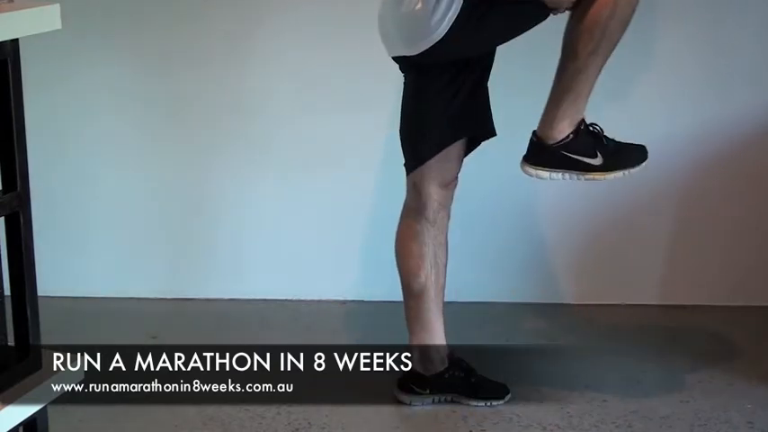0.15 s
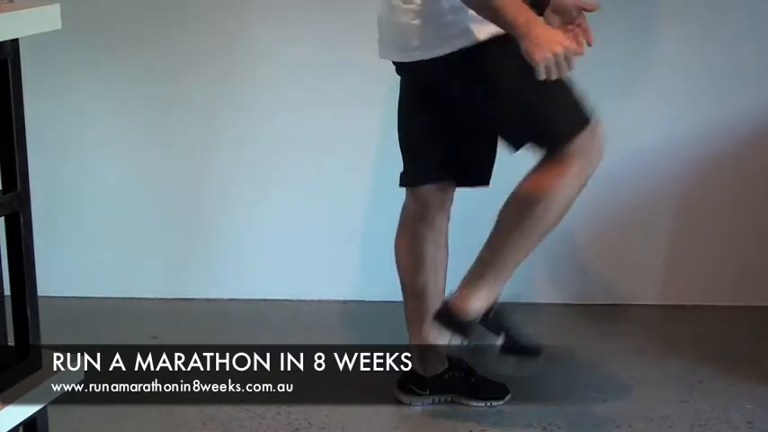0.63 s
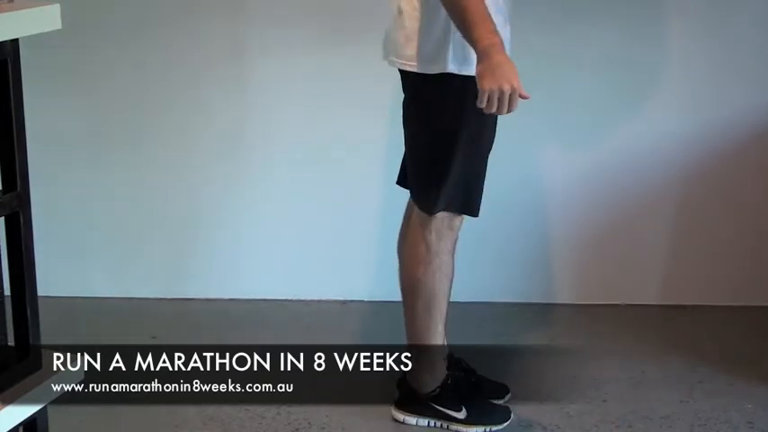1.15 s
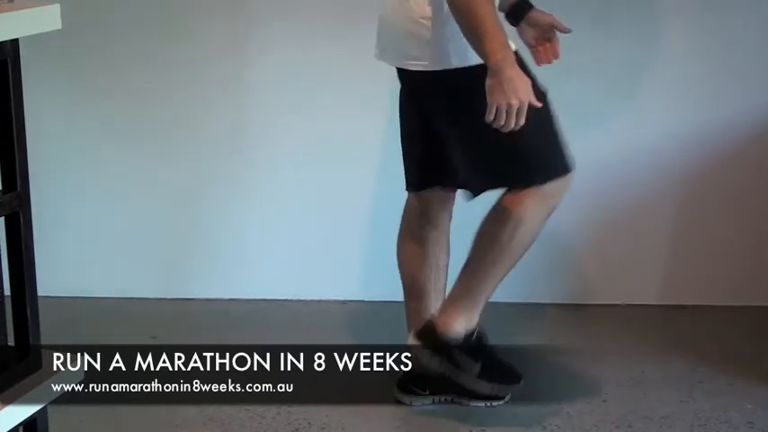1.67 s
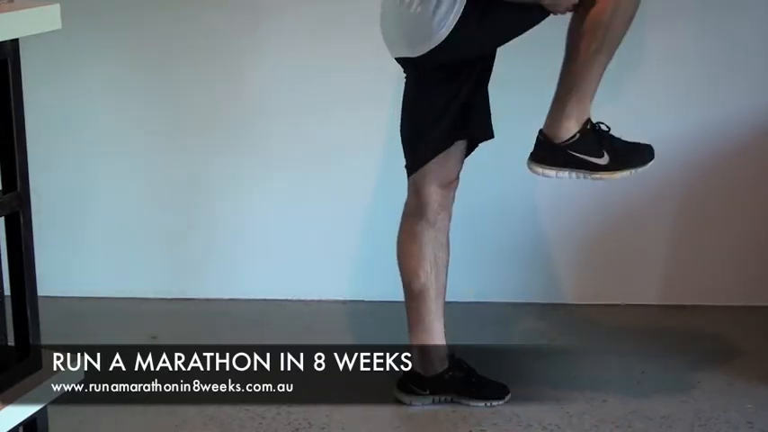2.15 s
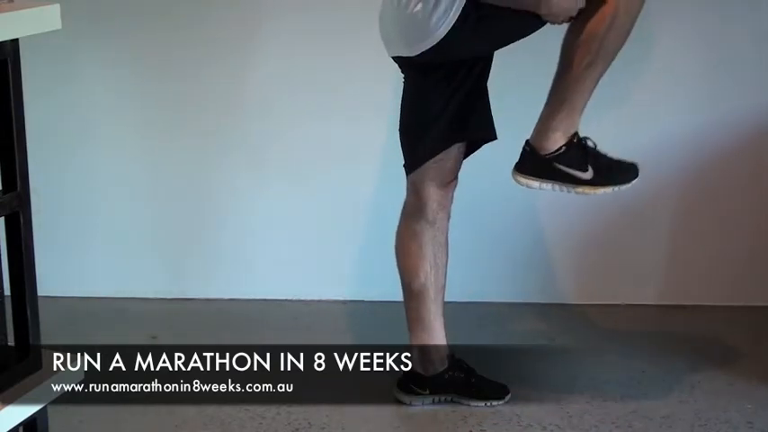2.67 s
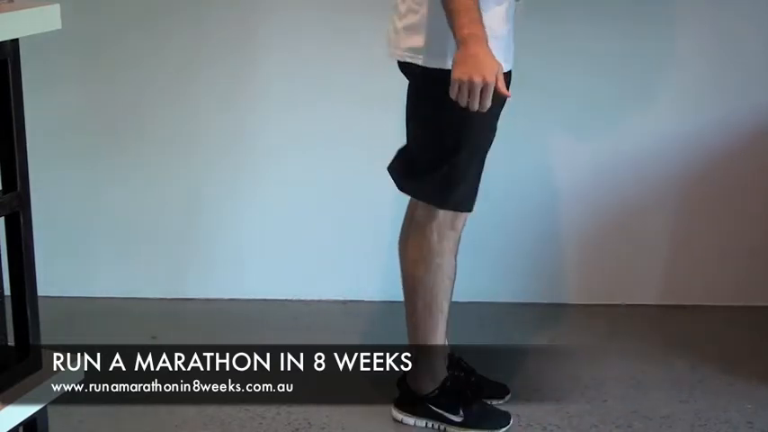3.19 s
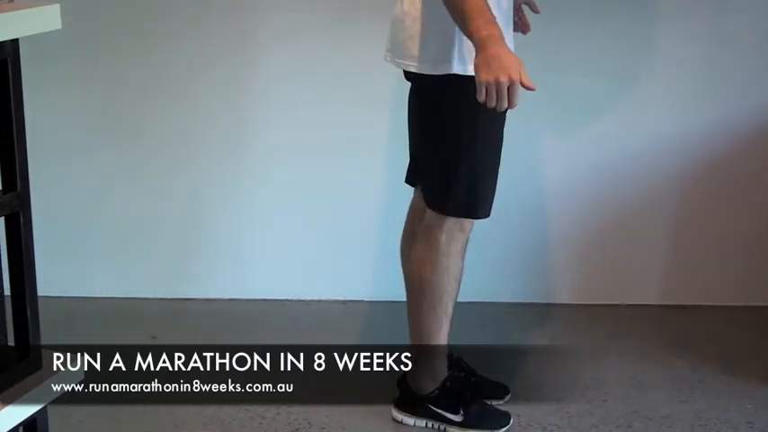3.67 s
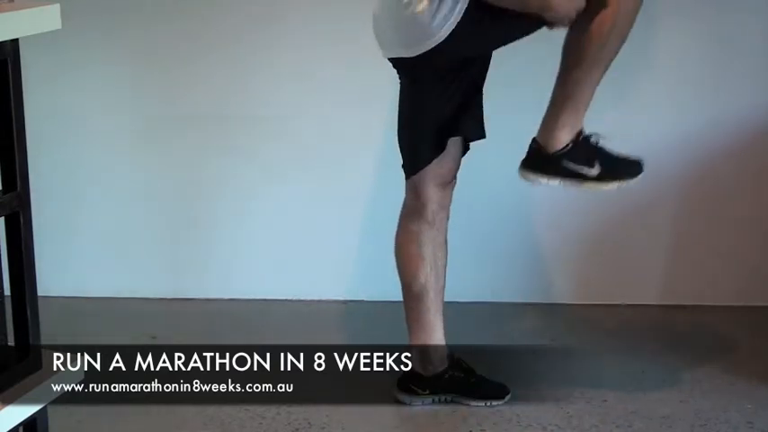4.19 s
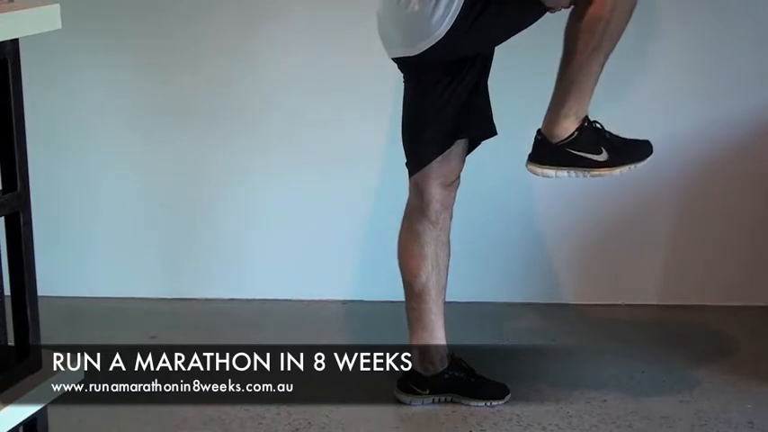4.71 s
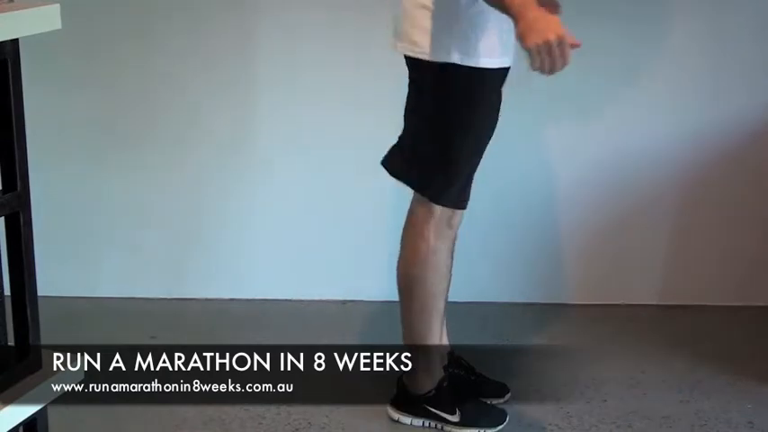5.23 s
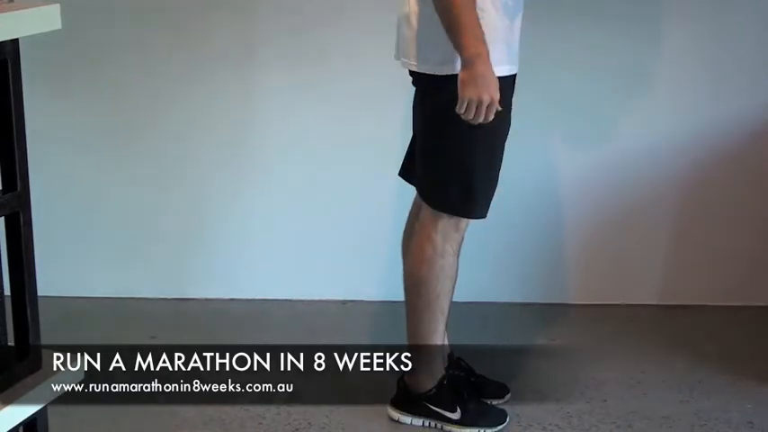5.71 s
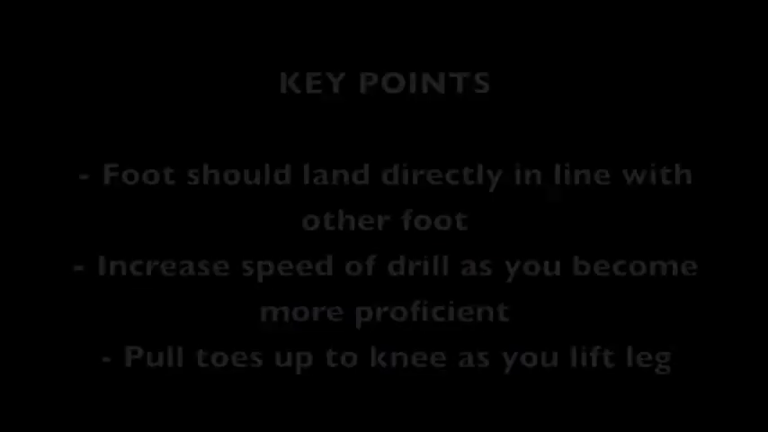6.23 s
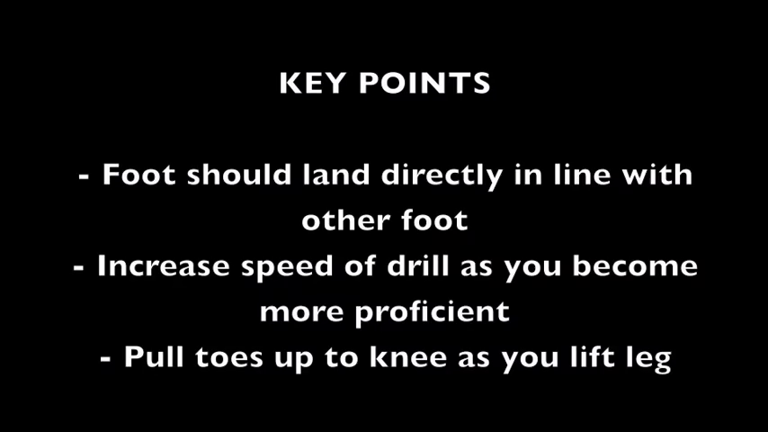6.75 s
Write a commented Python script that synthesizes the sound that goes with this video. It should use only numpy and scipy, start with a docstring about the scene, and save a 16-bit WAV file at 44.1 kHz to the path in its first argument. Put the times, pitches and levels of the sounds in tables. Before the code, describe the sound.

In a bare, hard-walled room, a rubber-soled shoe slaps concrete three times, roughly two seconds apart, the later two fuller and louder. Each smack is preceded by a light brush of shorts and followed by a short bright echo. Between them come quiet cloth rustle, foot scuffs and a faint hum. The camera microphone is fairly close, and the ending fades quickly to silence.

```python
"""Three hard slaps of a rubber-soled shoe on concrete ring through a bare room; loose shorts rustle between them.
Each slap is a pair of minimum-phase pulses convolved with wall echoes and a diffuse tail, plus low room modes.
Cloth, shuffle and air are coloured noise, squeaks are damped sines, ticks are decaying bands of noise.
The room hums faintly and the camera whines for a while; its limiter flattens the loudest slaps.
The sound fades out at the end."""
import sys
import numpy as np
from scipy import signal
from scipy.fft import rfft, irfft, next_fast_len
from scipy.io import wavfile
from scipy.ndimage import uniform_filter1d, map_coordinates

SR = 44100
rng = np.random.default_rng(int(sys.argv[2]) if len(sys.argv) > 2 else 0)


def bounce(signal):
    """Save signal as a 16-bit WAV file at the path given by the first command-line argument."""
    frames = np.transpose(np.atleast_2d(signal))
    limited = np.clip(frames, -1, 1)
    pcm = np.round(limited * 32767).astype(np.int16)
    wavfile.write(sys.argv[1], SR, pcm)


def field_ratio(decibels):
    """Amplitude ratio for a level in dB (20 dB per decade); scalars and array-likes work."""
    return 10 ** (np.asarray(decibels, dtype=float) / 20)


N = 302526

# Slaps: (time [s], blow level [dB], crack level relative to the blow [dB])
SLAP_EVENTS = [(0.779, 3.5, -11), (3.0520, 12.5, -18), (5.1620, 13.5, -13.5)]
# Relative spectrum of the sole meeting the floor, one list per slap: (frequency [Hz], level [dB])
SOLE_SPECTRA = [
    [(60, -39), (200, -13.5), (371, -4), (448, -10), (621, -1), (800, -3), (1340, -0.5), (2200, -9),
     (3500, -12.5), (6740, -30), (10300, -31.5), (16000, -51)],
    [(60, -39), (250, -23), (420, -7.5), (510, -7), (682, -2), (862, -10), (1040, -5.5), (1340, -10),
     (1780, -6), (2580, -12.5), (3190, -10), (5330, -35), (10000, -38.5), (16000, -54)],
    [(60, -30.5), (250, -18), (420, -8), (510, -8.5), (620, -1.5), (862, -13), (1040, -3), (1300, -13.5),
     (2000, -5.5), (2450, -15), (3190, -10.5), (6140, -32.5), (10000, -40), (16000, -55.5)],
]
# Relative spectrum of the first edge of the contact: (frequency [Hz], level [dB])
CRACK_SPECTRUM = [(500, -31), (2000, -22.5), (4500, -5), (6200, -11), (8000, -1.5), (9800, 4.5),
                  (11500, -0.5), (13000, -10.5), (15000, -15), (17000, -59)]
# Early reflections from floor and near walls: (delay [s], mean level relative to the direct sound [dB])
EARLY_REFLECTIONS = [(.0042, -5), (.0074, -6), (.0111, -8), (.0146, -13), (.0201, -14), (.0246, -14)]
# Low room modes: (frequency [Hz], level relative to the blow [dB], decay time t60 [s])
ROOM_MODES = [(98.4, -49, 0.69), (160, -39.5, .5), (190.2, -37.5, 0.5), (221.8, -38, 0.36),
              (266.5, -47.5, 0.66), (360, -38, 0.47), (427, -41.5, 0.74)]
# Diffuse decay: (frequency [Hz], decay time t60 [s])
DIFFUSE_DECAY = [(100, 0.93), (300, 0.63), (1000, 0.66), (3000, 0.66), (6000, 0.72), (12000, 0.5)]
# Relative colour of the diffuse tail: (frequency [Hz], level [dB])
TAIL_SPECTRUM = [(1500, 3.5), (4000, 0.5), (7500, -2), (10000, -5), (12500, -2), (15500, 1)]
# Likeness of left and right: (frequency [Hz], correlation [0-1])
STEREO_CORRELATION = [(30, 1), (100, 1), (290, 0.84), (640, .9), (1410, 0.85), (3100, 0.85), (4500, 0.94),
                      (6820, .99), (15000, .99)]

# Relative spectra of rubbing cloth, its airy middle, and the low shuffle: (frequency [Hz], level [dB])
RUSTLE_SPECTRUM = [(1470, -36), (2500, -4.5), (2990, -1.5), (6300, -5), (10700, -4.5), (12600, -13),
                   (15200, -13), (16000, -25)]
SWISH_SPECTRUM = [(700, -28), (1300, 0), (1800, 3), (2500, 0.5), (2900, -8), (4500, -28.5)]
SHUFFLE_SPECTRUM = [(80, -30.5), (150, -10.5), (340, -6.5), (560, -4.5), (1000, -5.5), (1500, -13.5),
                    (3000, -36)]
# Cloth and body at rest: (rustle level [dB], swish level [dB], shuffle level [dB])
REST_LEVELS = (-63, -66, -67.5)
# The hand lets the knee go and the shorts brush the thigh: (time [s], hold [s], level [dB])
RELEASE_EVENTS = [(0.505, 0.023, -46.5), (2.79, 0.024, -47.5), (4.905, 0.049, -46.5)]
# The leg falls through the shorts towards the floor: (time [s], hold [s], level [dB])
FALL_EVENTS = [(0.68, .04, -49.5), (3.02, .03, -50), (5.05, .1, -55.5)]
# The knee swings up and the cloth drags along the thigh: (time [s], hold [s], level [dB])
LIFT_EVENTS = [(1.89, .19, -53.5), (4.05, .2, -52.5)]
# The body settles or shifts its weight: (time [s], hold [s], level [dB])
SHIFT_EVENTS = [(0.0, 0.018, -63.5), (1.3, .1, -57), (1.63, 0.037, -55), (3.82, 0.08, -57),
                (4.5, 0.18, -64), (6.08, 0.099, -67.5)]
# The sole peels and scuffs on the floor: (time [s], hold [s], level [dB])
SCUFF_EVENTS = [(1.725, 0.07, -52), (1.87, 0.14, -53), (3.96, 0.017, -55), (4.05, 0.092, -48),
                (4.25, .02, -57), (6.12, .05, -57.5)]
# The raised leg sways in balance with an airy swish: (time [s], hold [s], level [dB])
SWAY_EVENTS = [(1.94, .07, -52), (2.12, 0.34, -59), (3.81, .05, -57), (4.1, .05, -58), (4.4, .3, -62.5)]
# Envelope and mix of each movement; the last three are relative to the event level:
# (rise [dB/s], fall [dB/s], rustle level [dB], swish level [dB], shuffle level [dB])
RELEASE_KIND = (281, 85, -0.5, -5.5, -10.5)
FALL_KIND = (91.5, 70, 0, -3, -6)
LIFT_KIND = (63.5, 45.5, 1, -11, -16)
SHIFT_KIND = (31.5, 36, -1.5, -3, -4.5)
SCUFF_KIND = (250, 70, -25, -9, 0)
SWAY_KIND = (101, 42.5, -16.5, -2, -2.5)
# Squeaks as the hand slips off the knee: (time [s], level before the soft onset [dB], frequency [Hz])
SQUEAK_EVENTS = [(0.6665, -38, 1840), (0.673, -25.5, 1850), (0.6816, -31, 1730), (0.697, -33, 1850),
                 (0.7208, -38.5, 1880), (0.736, -35, 1760)]
# Small cloth ticks: (time [s], starting noise level before the band-pass [dB], lowest frequency [Hz])
TICK_EVENTS = [(1.376, -42, 1500), (2.356, -42.5, 9500), (4.585, -45, 10000)]

# Relative spectrum of the quiet room air: (frequency [Hz], level [dB])
AIR_SPECTRUM = [(18, -42.5), (30, -23.5), (45, 0), (70, -3.5), (110, -6.5), (149, -10.5), (252, -10.5),
                (328, -12.5), (760, -17), (1350, -17.5), (3060, -23.5), (5450, -25.5), (11000, -29),
                (16000, -32)]
# Wavering tones of the room: (frequency [Hz], drift [Hz], rms level [dB])
HUM_TONES = [(49.4, .4, -70), (62.4, 0.37, -64.5), (66.7, .4, -64.5), (76, .4, -69.5), (5360, 80, -71)]
# Mains buzz that swells in and out: (time [s], rms level [dB])
BUZZ_LEVEL = [(0, -94), (.7, -63), (1.0, -64), (4.7, -61.5), (5.0, -72.5), (6.298, -67.5)]
# Camera whine: (frequency [Hz], rms level [dB])
WHINE_TONES = [(2998, -70.5), (11999, -78.5), (14998, -72.5)]
# Span of the whine: (start [s], end [s])
WHINE_SPAN = (2.27, 5.87)
# Closing fade: (start [s], end [s])
FADE_SPAN = (6.17, 6.245)


def slaps():
    """Impulsive excitation: a sharp edge and the slap of trapped air fill the room and ring its low modes."""
    out = np.zeros((2, N + 2 * SR))
    for (start, level_db, crack_db), sole in zip(SLAP_EVENTS, SOLE_SPECTRA):
        crack = field_ratio(crack_db) * pulse(CRACK_SPECTRUM)
        blow = crack - np.roll(pulse(sole), 8)  # the sole follows 8 samples later, in opposite polarity
        heard = signal.fftconvolve(blow[None], room(build_s=0.0005, tail_db=8.5), axes=1)
        heard[:, :SR] += room_modes()
        out[:, round(start * SR):][:, :heard.shape[1]] += field_ratio(level_db) * heard
    return out[:, :N]


def room_modes():
    """Modal resonance: standing waves fill gradually, then decay exponentially."""
    t = np.arange(SR) / SR
    ringing = np.zeros((2, SR))
    for hz, level_db, t60 in ROOM_MODES:
        phase = rng.normal(0, 0.3, size=(2, 1))
        ringing += field_ratio(level_db - 60 * t / t60) * np.sin(2 * np.pi * hz * t + phase)
    return ringing * (1 - np.exp(-t / 0.0043))


def room(build_s, tail_db):
    """Room impulse response: direct path, early reflections, and a diffuse field decaying at its own rate per band."""
    noise = rng.standard_normal((2, SR + SR // 4))
    hz, t, z = signal.stft(noise, SR, nperseg=256)
    decay = field_ratio(-60 * t / along(DIFFUSE_DECAY, hz)[:, None])
    tail = signal.istft(z * decay, SR, nperseg=256)[1]
    build_up = 1 - np.exp(-np.arange(tail.shape[1]) / SR / build_s)
    tail = spread(tail * build_up, TAIL_SPECTRUM)
    answer = field_ratio(tail_db) * tail / np.linalg.norm(tail[0])  # energy relative to the direct sound
    answer[:, 0] += 1
    for delay, level_db in EARLY_REFLECTIONS:
        answer[:, round(delay * SR)] += field_ratio(level_db + rng.normal(0, .7, size=2))
    return answer


def pulse(spectrum, size=2048):
    """Minimum phase: the folded cepstrum gives the most compact causal pulse of a colour, here with energy 1."""
    magnitude = field_ratio(along(spectrum, np.fft.rfftfreq(size, 1 / SR)))
    cepstrum = irfft(np.log(magnitude + 1e-6))
    cepstrum[1:size // 2] *= 2
    cepstrum[size // 2 + 1:] = 0
    p = irfft(np.exp(rfft(cepstrum)))
    return p / np.linalg.norm(p)


def legs():
    """Superposition of the sounds of cloth, skin and shoe as the legs move."""
    return moving_cloth() + squeaks() + ticks()


def moving_cloth():
    """Frictional noise: movements add in power and modulate rustle, swish and shuffle."""
    kinds = ((RELEASE_EVENTS, RELEASE_KIND), (FALL_EVENTS, FALL_KIND), (LIFT_EVENTS, LIFT_KIND),
             (SHIFT_EVENTS, SHIFT_KIND), (SCUFF_EVENTS, SCUFF_KIND), (SWAY_EVENTS, SWAY_KIND))
    rest_power = field_ratio(np.array(REST_LEVELS))[:, None] ** 2
    gains = np.sqrt(rest_power + sum(stirred(rows, kind) for rows, kind in kinds))
    rustle = gains[0] * rush(RUSTLE_SPECTRUM, patchy_db=1.2)
    swish = gains[1] * rush(SWISH_SPECTRUM, patchy_db=1.8)
    shuffle = gains[2] * rush(SHUFFLE_SPECTRUM, patchy_db=1.9)
    return rustle + swish + shuffle


def stirred(rows, kind):
    """Exponential envelopes: power of rustle, swish and shuffle under movements that rise, hold and fall."""
    rise_db, fall_db, *mix_db = kind
    now = np.arange(N) / SR
    power = np.zeros(N)
    for start, hold, level_db in rows:
        rise = rise_db * np.maximum(start - now, 0)
        fall = fall_db * np.maximum(now - start - hold, 0)
        power += field_ratio(level_db - rise - fall) ** 2
    return field_ratio(np.array(mix_db))[:, None] ** 2 * power


def squeaks():
    """Damped oscillation: the slipping hand gives brief sines with a soft onset."""
    t60_s, attack_s = 0.022, 0.0025
    out, t = np.zeros((2, N)), np.arange(SR // 20) / SR
    for start, level_db, hz in SQUEAK_EVENTS:
        envelope = field_ratio(level_db - 60 * t / t60_s) * (1 - np.exp(-t / attack_s))
        out[:, round(start * SR):][:, :len(t)] += envelope * np.sin(2 * np.pi * hz * t)
    return out


def ticks():
    """Transient noise: each cloth tick is a band of noise with exponential decay."""
    out, t = np.zeros((2, N)), np.arange(SR // 20) / SR
    for start, level_db, low_hz in TICK_EVENTS:
        band = signal.butter(2, [low_hz, 12500], "band", fs=SR, output="sos")
        noise = signal.sosfilt(band, rng.standard_normal(len(t)))
        out[:, round(start * SR):][:, :len(t)] += field_ratio(level_db - 60 * t / .025) * noise
    return out


def rush(spectrum, patchy_db):
    """Modulated noise: smoothed random gains in time and frequency make patches; the result has rms 1."""
    z = signal.stft(rng.standard_normal((2, N)), nperseg=512)[2]
    field = uniform_filter1d(rng.standard_normal(z.shape[1:]), size=6, axis=0)
    field = uniform_filter1d(field, size=8, axis=1)
    patchy = signal.istft(z * field_ratio(patchy_db * unit(field)), nperseg=512)[1][:, :N]
    return unit(spread(patchy, spectrum))


def spread(pair, spectrum):
    """Partial coherence: two unrelated signals, coloured, become mid and side of a stereo pair."""
    length = pair.shape[1]
    size = next_fast_len(length + 8192)
    hz = np.fft.rfftfreq(size, 1 / SR)
    turn = np.arccos(np.clip(along(STEREO_CORRELATION, hz), -1, 1)) / 2
    coloured = rfft(pair, size) * field_ratio(along(spectrum, hz))
    mid, side = irfft(coloured * [np.cos(turn), np.sin(turn)], size)[:, :length]
    return np.array([mid + side, mid - side])


def unit(x):
    """Normalisation to a root-mean-square value of 1."""
    return x / np.sqrt(np.mean(x ** 2) + 1e-20)


def along(points, hz):
    """Interpolation of (frequency [Hz], value) points on a logarithmic frequency axis."""
    f, v = np.transpose(points)
    return np.interp(np.log(hz + 1), np.log(f + 1), v)


def background():
    """Superposition of the room's stationary air noise, its wavering tones and the mains buzz."""
    return room_air() + room_hum() + mains_buzz()


def room_air():
    """Broadband noise: the quiet room as coloured random pressure."""
    return field_ratio(-55.5) * rush(AIR_SPECTRUM, patchy_db=1.5)


def room_hum():
    """Line spectrum: steady tones, each drifting slightly in frequency."""
    return sum(field_ratio(level_db) * tone(hz, wander_hz) for hz, wander_hz, level_db in HUM_TONES)


def mains_buzz():
    """Amplitude modulation: a tone near 100 Hz swells in and out."""
    level_db = np.interp(np.arange(N) / SR, *np.transpose(BUZZ_LEVEL))
    return field_ratio(level_db) * tone(hz=100, wander_hz=.4)


def tone(hz, wander_hz):
    """Frequency modulation: a sine of rms 1 follows a smooth random drift."""
    knots = rng.standard_normal(int(N / SR * (3 + 4 * wander_hz)) + 4)
    drift = map_coordinates(knots, [np.linspace(1, len(knots) - 2, N)])
    phase = 2 * np.pi * np.cumsum(hz + wander_hz * drift) / SR
    return np.sqrt(2) * np.sin(phase + rng.uniform(0, 0.74, size=(2, 1)))


def scene():
    """Linear superposition of everything that reaches the microphones."""
    return slaps() + legs() + background()


def limited(x, top_db, attack_s, release_db):
    """Peak limiting: gain falls under a peak, climbs at release_db per second, and is smoothed over attack_s."""
    need_db = np.minimum(0, top_db - 20 * np.log10(np.abs(x).max(axis=0) + 1e-9))
    climb_db = release_db * np.arange(N) / SR
    held_db = np.minimum(0, np.minimum.accumulate(need_db - climb_db) + climb_db)
    keep = np.exp(-1 / (attack_s * SR))
    return x * field_ratio(signal.lfilter([1 - keep], [1, -keep], held_db))


def camera_whine():
    """Pure tones: constant sines, gated on for one span."""
    now = np.arange(N) / SR
    whine = sum(field_ratio(level_db) * np.sqrt(2) * np.sin(2 * np.pi * hz * now) for hz, level_db in WHINE_TONES)
    return whine * (now > WHINE_SPAN[0]) * (now < WHINE_SPAN[1])


def low_pass(x):
    """Removes everything above the highest recorded frequency."""
    return signal.sosfilt(signal.butter(12, 15870, fs=SR, output="sos"), x)


def record(dry):
    """Signal chain: limiting, soft saturation, bass cut, added camera whine and closing fade."""
    x = limited(dry, top_db=-4, attack_s=.0001, release_db=399.0)
    ceiling = .75  # amplitude that soft overload approaches
    x = x / (1 + np.abs(x / ceiling) ** 4) ** (1 / 4)
    x = signal.sosfilt(signal.butter(1, 25, "high", fs=SR, output="sos"), x)
    x = x + camera_whine()
    fade_start, fade_end = FADE_SPAN
    remaining = (fade_end - np.arange(N) / SR) / (fade_end - fade_start)
    mix = x * np.clip(remaining, 0, 1) ** 0.99
    return low_pass(mix)


dry = scene()
out = record(dry)
bounce(out)
```